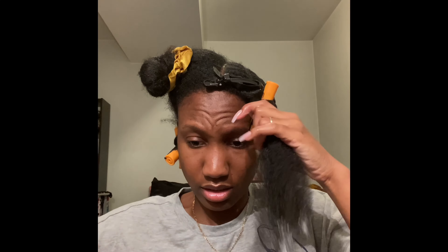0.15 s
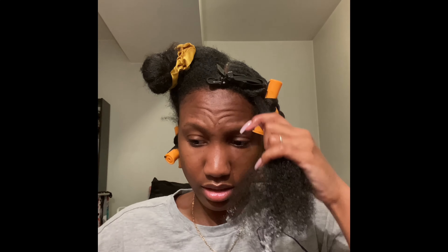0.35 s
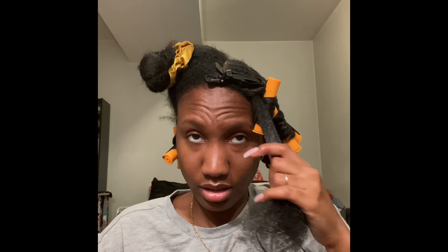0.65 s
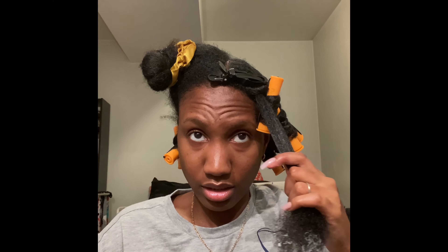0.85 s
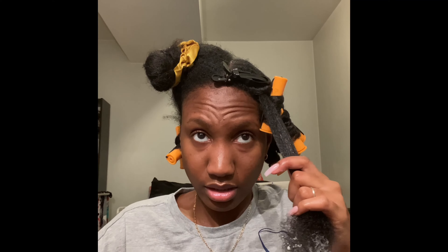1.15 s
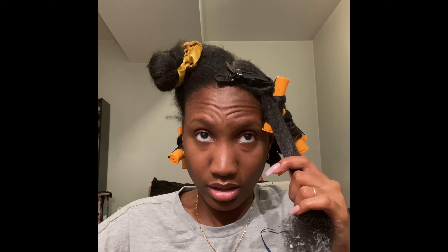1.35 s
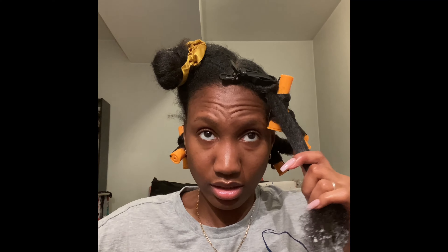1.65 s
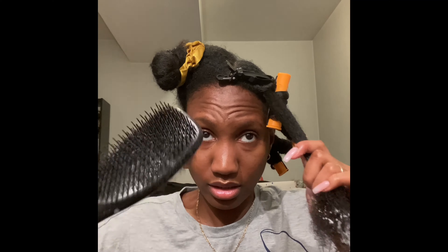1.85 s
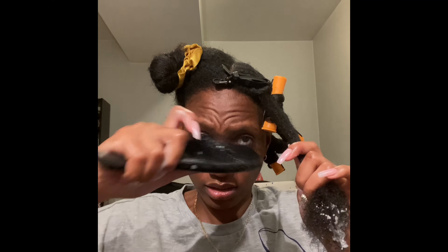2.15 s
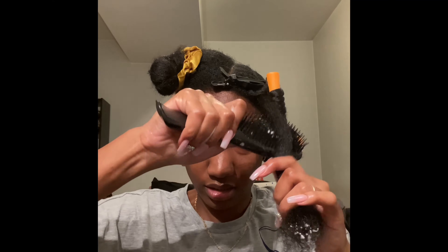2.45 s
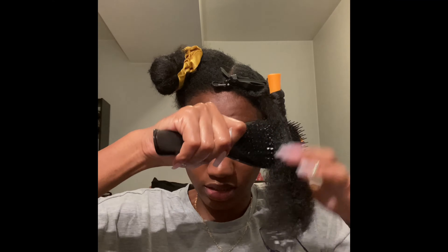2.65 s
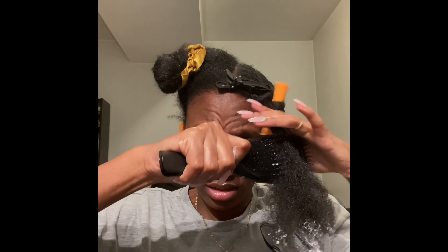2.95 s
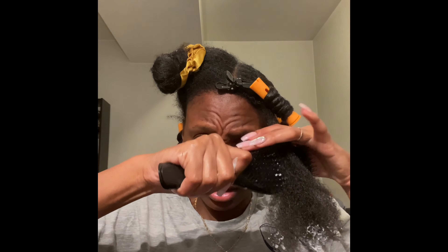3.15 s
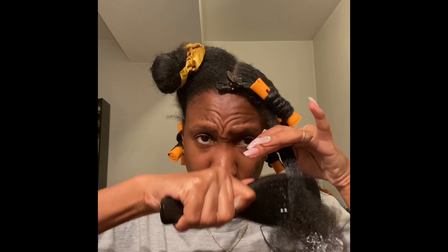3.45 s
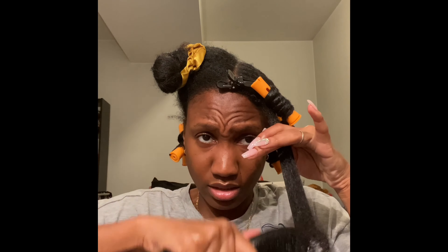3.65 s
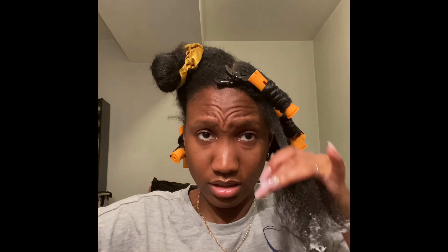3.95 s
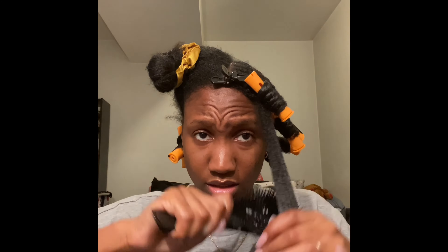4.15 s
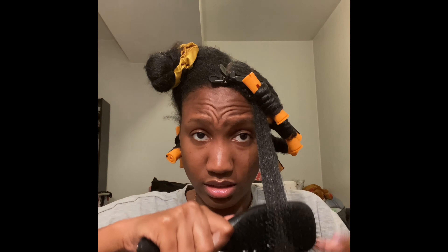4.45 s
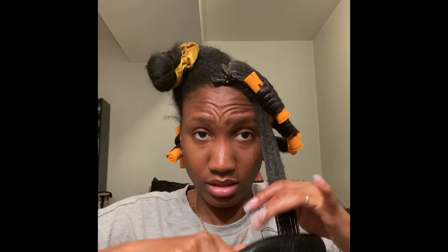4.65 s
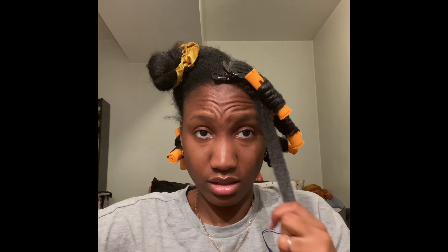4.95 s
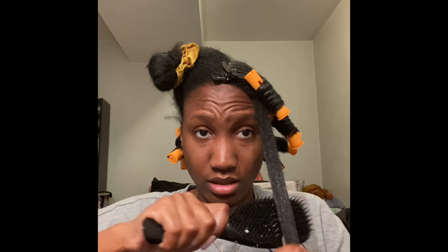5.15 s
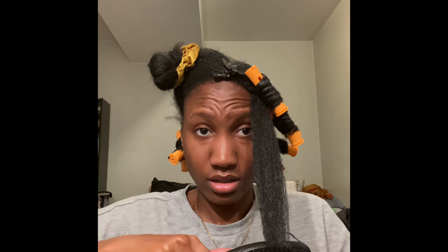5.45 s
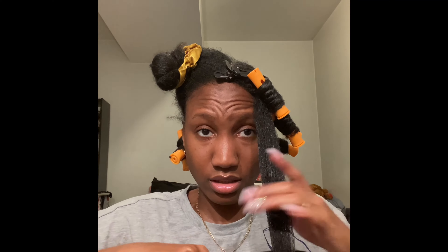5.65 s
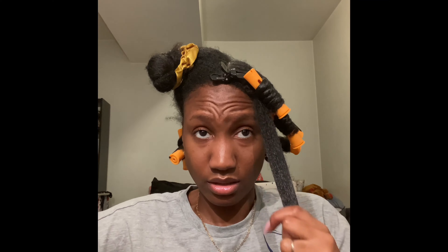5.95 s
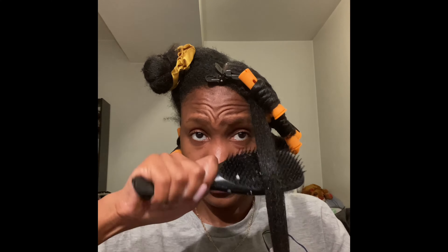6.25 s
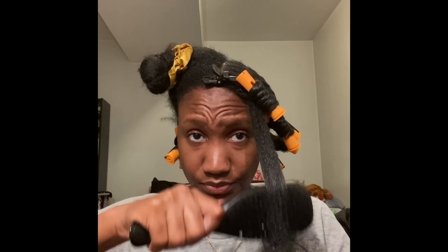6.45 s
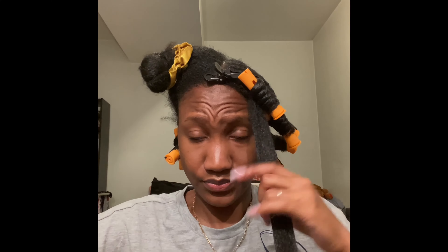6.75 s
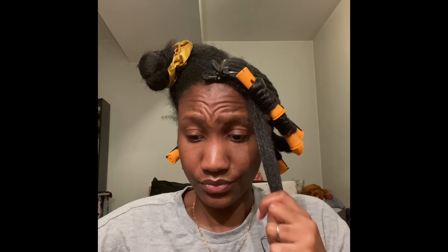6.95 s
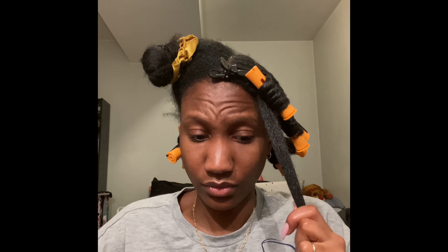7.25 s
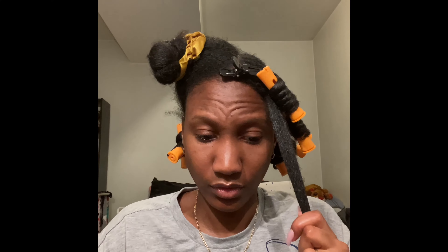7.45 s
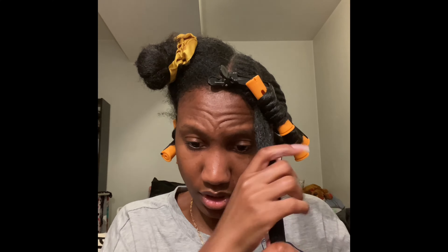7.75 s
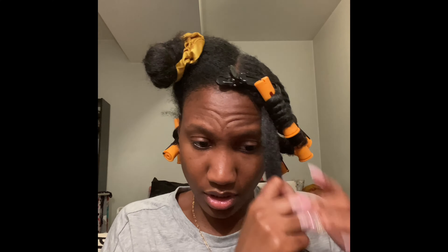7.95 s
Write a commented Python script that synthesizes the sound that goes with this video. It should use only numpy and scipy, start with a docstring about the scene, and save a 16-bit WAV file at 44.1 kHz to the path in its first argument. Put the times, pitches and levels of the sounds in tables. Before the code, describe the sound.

A plastic comb clatters and slides on a desk, then a brush drags softly through damp hair before another clattering burst in a small quiet room.

```python
"""Combs and brushes clatter and slide on a desk top, early and late, close to a pair of microphones.
Blows start decaying modes of plastic and desk; slides drive the plastic modes with dense small slips.
Between, bristles drag through damp hair: grainy friction noise, ringing bristles and tugs on the cushion.
Nails tick on plastic; the small quiet room adds a short tail over low rumble, a hum and faint air noise."""
import sys
import numpy as np
from scipy import signal
from scipy.fft import rfft, irfft, next_fast_len
from scipy.io import wavfile
from scipy.ndimage import uniform_filter1d

SR = 44100
rng = np.random.default_rng(int(sys.argv[2]) if len(sys.argv) > 2 else 0)


def persist_wave(psi):
    """Save psi, clipped to +-1, as 16-bit WAV."""
    counts = np.round(np.clip(psi, -1, 1) * 32767).astype(np.int16)
    wavfile.write(sys.argv[1], SR, np.atleast_2d(counts).T)


N = 357210

# knocks of plastic tools on the desk, levels relative within each layer: start_s, click_db, thud_db,
# hollow_db, crack_db, click_centre_hz, hollow_centre_hz, crack_peak_hz, left_minus_right_db
KNOCKS = [(0.4325, -23.5, -46, -31, -28.5, 2451, 511.3, 4361, 0.5),
          (0.445, -21, -39, -25, -27, 2800, 603, 3150, 3),
          (0.4715, -12, -38, -11.5, -27, 2300, 795.6, 3000, 3.5),
          (0.5021, -16.5, -55, -13.5, -30, 2250, 804, 6010, -3),
          (0.5178, -17, -40, -24.5, -35.5, 2035, 598.3, 3191, 5),
          (0.5505, 0, -13.5, -1.5, -10.5, 2884, 600, 8057, 0.5),
          (0.577, -22, -39.5, -34.5, -37, 2400, 600, 4000, 0),
          (0.6159, -5.5, -21.5, -13, -30.5, 1750, 900, 6000, 1.5),
          (0.644, -42, -30, -22, -54, 1300, 800, 3000, 0),
          (0.6562, -14.5, -25, -28.5, -30, 1775, 1000, 6610, -12),
          (0.6612, -10, -35.5, -37.5, -32.5, 1500, 1000, 6450, 10.5),
          (0.673, -26, -56, -39, -39, 1670, 900, 4980, 1.5),
          (0.6858, -20, -34.5, -51, -45, 1874, 600.8, 7000, 0),
          (0.7095, -43, -40, -35.5, -40.5, 3784, 509, 5000, 6),
          (0.877, -16, -77, -35, -31, 2864, 501.6, 3730, 3),
          (0.8844, -42, -30, -62, -31.5, 2740, 500.5, 6400, 0.5),
          (0.905, -40, -55, -26, -56, 1900, 900, 3300, -6),
          (0.941, -25, -42, -36.5, -39, 2700, 500, 3800, 6),
          (1.004, -35, -34, -34, -74, 1688, 900, 3000, -2),
          (1.0139, -17.5, -27, -35.5, -23, 3900, 403.6, 4400, 3),
          (1.0455, -16.5, -20.5, -13, -21, 3600, 450, 6630, 0),
          (1.2164, -14.5, -34.5, -16, -33.5, 1746, 601.5, 3850, 1.5),
          (1.562, -44, -56.5, -32, -64.5, 1425, 633.8, 2800, 1),
          (1.575, -49, -52, -32, -74.5, 2700, 620, 3570, 7.5),
          (1.5938, -41, -63, -33, -69.5, 1355, 523.4, 3000, 4),
          (7.1995, -25, -24, -28.5, -39, 4900, 428, 7500, 5),
          (7.2125, -11.5, -23.5, -20, -25.5, 2284, 532, 4160, 0),
          (7.2405, -3.5, -19.5, -10.5, -24, 1900, 501, 4030, 2.5),
          (7.2477, -17.5, -30.5, -9, -26.5, 2660, 800, 6310, -4),
          (7.2572, -5, -13.5, -5, -18.5, 2398, 450, 7490, -0.2),
          (7.2755, -9.5, -30, -20, -31.5, 2016, 463, 9500, 3.5),
          (7.281, -24.5, -41.5, -34, -26, 2200, 493, 4200, 1.5),
          (7.3081, -30.5, -38.5, -26.5, -44.5, 2180, 499.8, 3980, 3.5),
          (7.3373, -8, -7.5, -6, -20, 1994, 420, 6510, 2),
          (7.356, -10, -38, -31.5, -37, 3398, 497.7, 5910, 3.5),
          (7.361, -37.5, -34, -29.5, -30, 2975, 501.8, 6540, -1),
          (7.365, -11.5, -38, -1.5, -34.5, 2190, 750, 6650, 1),
          (7.3805, -15, -36.5, -12.5, -39.5, 2100, 798, 4000, 7),
          (7.3985, -7, -21.5, -23.5, -19, 2687, 517.5, 4270, 0.5),
          (7.427, -15.5, -38, -28, -30, 2279, 900, 4320, 3.5),
          (7.457, -19.5, -17, -27, -25.5, 2300, 420, 5550, 2),
          (7.4699, -26, -29, -26, -32.5, 2220, 420, 6500, 1.5),
          (7.4814, -17.5, -27.5, -14.5, -26, 3120, 498, 6150, -3),
          (7.4875, -13, -35, -31, -30, 1400, 1000, 3047, 10),
          (7.4959, -13.5, -32.5, -22.5, -31, 3214, 500, 5490, 8.5),
          (7.501, -16, -29.5, -13.5, -28.5, 2920, 699, 6640, -1.5),
          (7.52, -21, -23, -38, -34.5, 1700, 500, 7400, 1.5),
          (7.533, -21.5, -36.5, -37.5, -41, 2100, 500, 8000, 1),
          (7.5462, -13.5, -44, -19.5, -23, 2214, 600, 4120, 1),
          (7.5555, -1, -23.5, -9, -25.5, 1370, 630, 6300, 1.5),
          (7.5754, -17, -17, -6.5, -30, 2241, 793, 4000, 4),
          (7.6045, -31, -27, -22, -51, 1307, 897, 4000, 18)]
# modes of the desk top: pitch_hz, level_db, t60_s
DESK_MODES = [(65.6, -13.5, 0.39), (110, -13.5, 0.29), (190.7, -0.5, 0.22), (243.2, 2, 0.13),
              (335, 3, 0.0073)]
# hollow modes of the desk and the tools on it, ringing freely: pitch_hz, level_db, t60_s
HOLLOW_MODES = [(380, -6, 0.04), (445, -1, 0.07), (510, -1, 0.045), (625, -2, 0.055), (686, -1.5, 0.04),
                (850, -2, 0.04), (1020, -1, 0.03), (1150, -2, 0.018)]
# modes of the plastic tools, ringing freely: pitch_hz, level_db, t60_s
PLASTIC_MODES = [(1250, -1, .022), (1480, -2, .022), (1700, -5, .02), (1900, -3, .026), (2070, -3, .028),
                 (2290, -1, .03), (2520, -5, .022), (2720, -1, .03), (3300, -4, .022), (3750, -4, .018),
                 (4250, -3, .02), (5200, -6, .012), (6500, -6, .008)]
# resonances of the brush cushion: pitch_hz, width_hz, level_db
CUSHION_PEAKS = [(422, 22, -3), (595, 120, 5), (675.5, 38, 8), (1094, 230, -9), (420, 280, -1)]
# relative spectrum of hair on bristles: frequency_hz, density_db_per_hz
HISS_SPECTRUM = [(700, -14.5), (1100, -7.5), (1800, -18), (3000, -16), (4200, -9), (6000, -8), (11300, -14),
                 (12400, -20), (14500, -46)]
# relative spectrum of hard contact noise: frequency_hz, density_db_per_hz
CRACK_SPECTRUM = [(500, -33.5), (1000, -5.5), (2500, -9), (3200, -2.5), (4800, -11), (7800, -14.5),
                  (11500, -23.5), (13500, -36.5), (15500, -46.5)]
# nominal phase by which the left microphone leads the right for the desk: frequency_hz, lead_rad
DESK_LEAD = [(0, -0.5), (340, -0.26), (1290, 9), (1640, 8), (2410, 4), (3010, 9.5), (3270, 8.5), (4050, 2),
             (4820, 11.5), (6030, 1.5), (7150, 11.5), (9220, 13.5), (12100, 4), (15500, 6.5)]

SNIPPET = 4096  # samples in one blow
PATCHES = 180  # points in time for the changes of chatter and flicker
GRIP_DETUNE = .014  # spread of mode pitch from blow to blow, as a share
FLICKER_DB = 1.6  # spread of the flickering bands of hiss and rustle
SOFT_HZ = 11300  # the treble of clicks and scrapes rolls off above this


def knocks():
    """Each knock is a bright click from its own spot; the desk top answers a moment later with a low thud."""
    # knocks after which the tool rings freely: start_s
    let_go = [0.5178, 1.0455, 1.2164, 1.562, 1.575, 1.5938, 7.2125, 7.2755, 7.3985, 7.427, 7.5462]
    held_ring = .52  # share of the ring time left when the hand stays on the tool
    contact_s = .0015
    crack_peak_db, crack_q = 13.5, 3.8  # each crack has a bright peak of its own
    s, click_db, thud_db, hollow_db, crack_db, click_hz, hollow_hz, crack_hz, pan_db = np.transpose(KNOCKS)
    is_free = np.abs(s[:, None] - let_go).min(axis=1) < .003
    ring_share = np.where(is_free, 1, held_ring)

    thud = lay(s + 0.0021, taps(thud_db - 3.0, DESK_MODES, contact_s, 0.26, size=3 * SNIPPET))
    thud = sos_filter(signal.butter(2, 700, fs=SR, output="sos"), thud)  # the heavy top takes the blow softly
    hollow = taps(hollow_db - 3.5, HOLLOW_MODES, 1.3 * contact_s, 2.3, hollow_hz, 15, GRIP_DETUNE,
                  ring_share=ring_share)
    click = taps(click_db - 4, PLASTIC_MODES, contact_s, 3, click_hz, 26, GRIP_DETUNE, ring_share=ring_share)
    click = sos_filter(signal.butter(4, SOFT_HZ, fs=SR, output="sos"), click)
    crack = []
    for burst, hz in zip(bursts(crack_db + 8, 0.7 * contact_s), crack_hz):
        peak = signal.lfilter(*signal.iirpeak(hz, crack_q, SR), burst)
        crack.append(burst + amp(crack_peak_db) * peak)
    bright = click + colour(np.array(crack), CRACK_SPECTRUM)
    placed = lay(s, place(hollow + bright, DESK_LEAD, pan_db))
    return thud, lay(s, hollow), lay(s, bright), placed


def slides():
    """Dragging tools chatter on the desk: dense small blows that wander from mode to mode, over a dry hiss."""
    # tools dragged over the desk, levels at full strength:
    # start_s, end_s, scrape_db, hollow_db, hiss_db, boom_db, scrape_centre_hz
    drag_marks = [(0.439, 0.431, -82, -78, -75, -75.5, 2400), (0.453, 0.517, -35, -47.5, -49.5, -59, 2221),
                  (0.626, 0.725, -63, -42, -80, -45, 1604), (0.796, 0.885, -59.5, -46, -65.5, -49, 2495),
                  (0.894, 0.935, -46, -40, -58, -41, 3300), (0.938, 0.984, -46, -45.5, -56.5, -44, 2870),
                  (1.078, 1.119, -39.5, -40.5, -50.5, -56, 2610), (1.14, 1.137, -57, -39, -69, -58, 1510),
                  (1.18, 1.194, -72, -52.5, -71, -38.5, 2227), (1.538, 1.556, -77, -78, -77, -74, 1590),
                  (1.421, 1.497, -85, -81, -100.5, -75, 1874), (1.575, 1.585, -53, -50, -66, -53, 2013),
                  (7.191, 7.199, -68, -67, -73, -79, 2800), (7.345, 7.398, -34.5, -22, -61, -30, 2362),
                  (7.425, 7.54, -44.5, -40.5, -64, -27, 2360), (7.6, 7.744, -85, -83, -89, -60.5, 2003)]
    rise_db_per_s, fall_db_per_s = 895.5, 354.5
    wander_db = 5  # spread of mode strengths along a slide
    slide_detune, slide_damping = .03, .9  # spread of pitch along a slide; share of ring time left in contact
    *drag, boom_gain = held(np.array(drag_marks)[:, :6], rise_db_per_s, fall_db_per_s)
    scrape_gain, hollow_gain, hiss_gain = np.hypot(drag, chatter())

    # the favoured pitch moves from event to event
    moments = (np.arange(PATCHES) + .5) * N / PATCHES / SR
    centres = [(row[0], row[5]) for row in KNOCKS]
    centres += [((row[0] + row[1]) / 2, row[-1]) for row in drag_marks]
    s, centre_hz = np.transpose(sorted(centres))
    scrape_hz = np.interp(moments, s, centre_hz)
    hollow_hz = np.interp(moments, *np.array(KNOCKS)[:, [0, 6]].T)
    steps = np.arange(N) * PATCHES // N
    wander = wander_db * rms_one(rng.standard_normal((len(PLASTIC_MODES), PATCHES)))
    scrape_lean = amp(wander + favour(PLASTIC_MODES, scrape_hz, 40.0))
    hollow_lean = amp(wander[:len(HOLLOW_MODES)] + favour(HOLLOW_MODES, hollow_hz, 4.2))

    rattle = grains(1200.0, 3.0, 2.0)
    pressed = ring(rattle * scrape_lean[:, steps], np.array(PLASTIC_MODES) * [1, 1, slide_damping])
    # the pitch drifts with pressure: the sound is read at an uneven pace without a lasting offset
    pace = slide_detune * rms_one(signal.resample(rng.standard_normal(PATCHES), N))
    drift = np.cumsum(pace - uniform_filter1d(pace, size=SR // 4))
    pressed = np.interp(np.arange(N) + drift, np.arange(N), pressed)
    hiss = patchy(colour(rattle, CRACK_SPECTRUM), FLICKER_DB)
    bright = scrape_gain * rms_one(pressed) + hiss_gain * hiss
    boom = rms_one(ring([grains(140.0, 0.83, -8.5)] * len(DESK_MODES), DESK_MODES))
    hollow = rms_one(ring(rattle * hollow_lean[:, steps], HOLLOW_MODES))
    return boom_gain * boom + hollow_gain * hollow, bright


def chatter():
    """After a knock the tool chatters on: gains for scrape, hollow and hiss jump and die away."""
    # tails that follow click, hollow knock and crack: level_under_knock_db, t60_s
    chatter_tails = [(-29, 0.16), (-19.5, 0.19), (-25, 0.3)]
    knock, power = np.array(KNOCKS), np.zeros((3, N))
    for row, db, (under_db, t60) in zip(power, knock[:, [1, 3, 4]].T, chatter_tails):
        row[(knock[:, 0] * SR).astype(int)] = amp(db + under_db) ** 2
        row[:] = signal.lfilter([1], [1, -amp(-60 / (t60 * SR)) ** 2], row + 1e-18)
    return np.sqrt(power)


def strokes():
    """Strands slip off the bristles: a grainy hiss, ringing bristles, and tugs that ring the cushion."""
    # brush and fingers through the hair, one curve a stroke: time_s, hiss_db, cushion_db
    stroke_curves = [
        [(0.0, -71, -97), (0.05, -80, -102)],
        [(2.85, -83, -103.5), (2.98, -78.5, -84.5), (3.09, -76, -85.5), (3.204, -70.5, -66),
         (3.292, -67, -68.5), (3.414, -62, -50.5), (3.544, -61, -51), (3.622, -71.5, -51)],
        [(3.75, -70.5, -57), (3.812, -70, -53.5)],
        [(4.1, -69, -73.5), (4.204, -72, -76.5), (4.344, -78.5, -83)],
        [(4.4, -74.5, -79.5), (4.584, -66.5, -54), (4.626, -65, -54.5), (4.764, -66.5, -52.5)],
        [(5.066, -66.5, -63), (5.132, -73, -69), (5.184, -64, -69), (5.23, -68, -65)],
        [(5.606, -66, -68), (5.752, -68.5, -65), (5.824, -81, -54)],
        [(6.074, -76.5, -69.5), (6.152, -68, -65), (6.264, -72.5, -86), (6.336, -68.5, -68),
         (6.598, -77.5, -79.5), (6.696, -72, -66.5), (6.77, -67, -71.5)],
    ]
    # the bristles whisper alone: start_s, end_s, level_db
    faint_marks = [(0.12, 0.22, -87), (7.83, 7.99, -80.5)]
    # bristle notes that stand alone when barely touched: pitch_hz, width_hz, level_db
    whisper_notes = [(2050, 55, 0), (3750, 120, -5)]
    # bristle notes under a full stroke: pitch_hz, width_hz, level_db
    bristle_notes = [(1390, 80, -1), (2010, 160, 1.5), (2700, 68, 1), (3670, 490, -7)]
    bite_db_per_s, lift_db_per_s = 425, 272  # the hiss of a stroke sets in and dies away
    cushion_quicker = 2.7  # the cushion does so faster by this factor
    ring_from_cushion, ring_db = 0.32, -2  # the bristles ring with a blend of hiss and cushion level

    whisper_gain = held(faint_marks, bite_db_per_s, lift_db_per_s)[0]
    whisper = whisper_gain * resonate(rng.standard_normal(N), whisper_notes)
    hiss_gain = cushion_gain = ring_gain = 0
    for rows in stroke_curves:
        levels, edges = shape(rows, bite_db_per_s, lift_db_per_s)
        hiss_db = levels[0] + edges
        cushion_db = levels[1] + cushion_quicker * edges
        hiss_gain = hiss_gain + amp(hiss_db)
        cushion_gain = cushion_gain + amp(cushion_db)
        ring_gain = ring_gain + amp(ring_db + hiss_db + ring_from_cushion * (cushion_db - hiss_db))

    catch = snags(hiss_gain)
    slips = catch * grains(900.0, 4.0, 4.0)
    plucks = catch * grains(500.0, 4.7, -2.0)
    tugs = catch * grains(250.0, 4.0, -4.0)
    hiss = hiss_gain * rms_one(colour(slips, HISS_SPECTRUM))
    bristles = ring_gain * resonate(plucks, bristle_notes)
    return whisper + hiss + bristles + cushion_gain * resonate(tugs, CUSHION_PEAKS)


def snags(hiss_gain):
    """Gain that leaps when a knot catches and relaxes within milliseconds; a strong pull catches more knots."""
    most_per_s, relax_s, leap_db = 67, 0.0019, -0.5  # the leap is scaled by an uneven share below
    pull = np.minimum(hiss_gain / hiss_gain.max() * 1.5, 1)
    caught = (rng.random(N) < most_per_s / SR * pull ** 2) * rng.uniform(0.64, 0.75, N)
    return 1 + amp(leap_db) * signal.lfilter([1], [1, -np.exp(-1 / (relax_s * SR))], caught)


def ticks():
    """A sharp tick rings plastic near its own pitch and the cushion; bristles rustle just before and after."""
    # nails and bristle tips on plastic, levels relative within each layer:
    # start_s, tick_db, crack_db, cushion_db, tick_centre_hz
    tick_marks = [(0.326, -95, -65, -97, 6030), (2.2256, -41.5, -43.5, -42, 3710),
                  (2.251, -58.5, -65, -68, 2570), (2.2725, -55.5, -45.5, -48, 2730),
                  (2.3736, -45, -59.5, -66, 2400), (2.3857, -63.5, -68, -53, 1370),
                  (2.6352, -39.5, -43.5, -76, 5030), (2.8172, -65, -57, -89, 3570),
                  (3.3902, -50, -65, -53, 1260), (3.406, -49.5, -69, -42, 1870),
                  (3.43, -51, -72, -57, 2140), (3.546, -48, -59, -57.5, 2027),
                  (3.6188, -66.5, -54.5, -56, 2020), (4.458, -64, -68, -60, 2070),
                  (4.498, -67.5, -69.5, -55, 2000), (4.516, -63, -68, -60, 2050),
                  (4.561, -56, -61, -41, 1930), (4.578, -59, -72, -58, 1810),
                  (4.594, -51.5, -67, -35.5, 1660), (4.6365, -56, -44, -46, 2040),
                  (4.692, -66.5, -70, -53, 2030), (4.714, -65, -72, -53, 3750),
                  (4.742, -60, -71.5, -44, 2016), (4.7644, -52, -63.5, -33.5, 1853),
                  (5.0641, -65, -52.5, -63.5, 1410), (5.7394, -67.5, -55, -47, 6170),
                  (5.7578, -91, -45.5, -49.5, 2283), (5.7832, -64.5, -54, -40, 2640),
                  (5.8186, -79, -86, -72.5, 1400), (6.0653, -64.5, -71, -64.5, 1970),
                  (7.733, -63.5, -50.5, -66.5, 4630)]
    # relative spectrum of the tick noise: frequency_hz, density_db_per_hz
    tick_spectrum = [(350, -98), (600, -12), (828, -43), (1100, 7), (3410, 5.5), (4350, 4.5), (5150, 7.5),
                     (13000, -16.5)]
    # relative spectrum of the rustling bristles: frequency_hz, density_db_per_hz
    rustle_spectrum = [(600, -30), (1000, -5), (2000, -4), (3500, -1), (5500, -10), (9000, -12.5),
                       (13000, -30.5)]
    lead_s, rise_t60_s = .01, .025  # the rustle swells ahead of a tick
    rustle_db, fall_t60_s = -10.5, 0.23  # and goes on after it
    s, tick_db, crack_db, cushion_db, centre_hz = np.transpose(tick_marks)
    cushion_modes = [(hz, db, 2.2 / width_hz) for hz, width_hz, db in CUSHION_PEAKS]  # width to ring time
    cushion = taps(cushion_db - 14, cushion_modes, 0.0006, 2.5)
    plastic = taps(tick_db + 1, PLASTIC_MODES, 0.00094, 1.0, centre_hz, 17.0, GRIP_DETUNE)
    snap = colour(bursts(tick_db + 20.5, 0.0012), tick_spectrum)
    snap = snap + colour(bursts(crack_db + 13.0, 0.0013), HISS_SPECTRUM)

    t = np.arange(3 * SNIPPET) / SR - lead_s
    swell = amp(-60 * np.abs(t) / np.where(t < 0, rise_t60_s, fall_t60_s))
    rustle_gain = lay(s - lead_s, amp((tick_db + crack_db) / 2 + rustle_db)[:, None] * swell)
    rustle = rustle_gain * patchy(colour(grains(730.0, 2.6, 3.1), rustle_spectrum), FLICKER_DB)
    return lay(s, cushion + plastic + snap), rustle


def room(x):
    """A diffuse tail of dying noise for each side; the treble dies twice as fast."""
    t60_s, wall_cut_hz = 0.27, 6000
    t = np.arange(SR // 2) / SR
    noise = rng.standard_normal((2, len(t))) * np.clip(t / 0.00025, 0, 1)
    dull = sos_filter(signal.butter(1, wall_cut_hz, fs=SR, output="sos"), noise)
    tail = dull * amp(-60 * t / t60_s) + (noise - dull) * amp(-120 * t / t60_s)
    return signal.fftconvolve(x[None], tail / np.sqrt(np.sum(tail[0] ** 2)), axes=1)[:, :N]


def background():
    """Rumble and hum reach both microphones together, a touch stronger left; the air noise is separate."""
    # the rumble swells as arms move and the desk shakes: start_s, end_s, level_db
    swell_marks = [(0.62, 0.66, -37), (3.27, 3.44, -46), (6.3, 6.5, -55), (7.38, 7.51, -27.5)]
    # relative spectrum of the rumble: frequency_hz, density_db_per_hz
    rumble_spectrum = [(22, -29.5), (35, -13), (55, 3.5), (90, -4), (110, -1.5), (140, -11), (190, -14),
                       (250, -28.5), (320, -34.5), (450, -53.5), (900, -74)]
    # relative spectrum of the air noise: frequency_hz, density_db_per_hz
    air_spectrum = [(210, -23.5), (350, -5.5), (529, -14.5), (681, -13), (1190, -18.5), (2040, -20),
                    (9180, -22.5), (13000, -31.5), (15500, -41.5)]
    hum_hz, hum_db, hum_waver_db = 122.1, -58, 2.5
    rumble_db, rumble_waver_db = -54, 1.5
    air_db, air_waver_db = -80.5, 1.5
    swell_rise_db_per_s, swell_fall_db_per_s = 127.5, 143
    swell_cut_hz = 35  # the swells lack the deepest rumble

    waver = slow_waver(120)
    hum_phase = 2 * np.pi * hum_hz * np.arange(N) / SR + 0.75 * waver
    hum = amp(hum_db + hum_waver_db * waver) * np.sqrt(2) * np.sin(hum_phase)
    calm_gain = amp(rumble_db + rumble_waver_db * slow_waver(16))
    calm = calm_gain * colour(rng.standard_normal(N), rumble_spectrum)
    shake = sos_filter(signal.butter(4, swell_cut_hz, "high", fs=SR, output="sos"),
                       colour(rng.standard_normal(N), rumble_spectrum))
    swells = held(swell_marks, swell_rise_db_per_s, swell_fall_db_per_s)[0] * shake
    low = amp([[.3], [-.3]]) * (calm + swells + hum)
    air = colour(rng.standard_normal((2, N)), air_spectrum)
    return low + amp(air_db + air_waver_db * slow_waver(40)) * air


def place(x, lead, pan_db):
    """Two microphones share each row; their difference holds a phase lead by frequency and scattered paths."""
    scatter_db, scatter_s = -12, 0.0014
    size = next_fast_len(x.shape[1] + 2048)
    hz = np.arange(size // 2 + 1) * SR / size
    turn = np.interp(hz, *np.transpose(lead)) / 2 * np.tanh(hz / 200)  # the bass arrives together
    paths = rng.standard_normal((len(x), 600)) * np.exp(-np.arange(600) / SR / scatter_s)
    paths = paths / np.sqrt(np.sum(paths ** 2, axis=1, keepdims=True))
    short_waves = hz / np.hypot(hz, 450)  # long waves pass small obstacles undisturbed
    scattered = amp(scatter_db) * short_waves * rfft(paths, size)
    # the lead as a bounded tangent, so the sum never cancels
    apart = 1j * 1.2 * np.sin(2 * turn) / (1.4 + np.cos(2 * turn)) + scattered
    sides = np.array([[1], [-1]])
    ports = amp(np.reshape(pan_db, (-1, 1, 1)) / 2 * sides) * (1 + apart[:, None] * sides)
    return irfft(ports * rfft(x, size)[:, None], size)[..., :x.shape[1]]


def taps(db, modes, contact_s, spread_db, centre_hz=None, narrow_db=22, detune=0, size=SNIPPET, ring_share=1):
    """One row per blow: modes start around the contact time, detuned at random, strongest near the centre."""
    hz, mode_db, t60 = np.array(modes).T[:, None, :, None]
    t60 = t60 * np.reshape(ring_share, (-1, 1, 1))
    delay, strength, sign, shift = np.moveaxis(rng.standard_normal((len(db), 4, len(modes), 1)), 1, 0)
    t = np.maximum(np.arange(size) / SR - np.abs(delay) * contact_s, 0)
    levels = db[:, None, None] + mode_db + spread_db * strength
    if centre_hz is not None:
        levels = levels + favour(modes, centre_hz, narrow_db).T[..., None]
    turns = 2 * np.pi * hz * (1 + detune * shift) * t
    gains = np.sign(sign) * amp(levels - 60 * t / t60) * np.tanh(t / contact_s)
    return np.sum(gains * np.sin(turns), axis=1)


def favour(modes, centre_hz, narrow_db):
    """dB for each mode, falling with the square of its distance in octaves from the centre."""
    return -narrow_db * np.log2(np.array(modes)[:, :1] / centre_hz) ** 2


def bursts(db, contact_s):
    """One row per blow: a brief swelling and dying burst of contact noise."""
    rise = np.arange(SNIPPET) / SR / np.clip(contact_s, 1e-4, .004)
    noise = rng.standard_normal((len(db), SNIPPET)) * rise * np.exp(-rise)
    return amp(db)[:, None] * noise / np.sqrt(np.sum(noise ** 2, axis=1, keepdims=True))


def grains(per_s, spread_db, bed_db):
    """Random slips of uneven size over a bed of smooth friction noise; rms 1."""
    sizes = amp(spread_db * np.minimum(rng.exponential(1, N), 4)) * rng.choice([-1, 1], N)
    slips = rms_one(sizes * (rng.random(N) < per_s / SR))
    return rms_one(slips + amp(bed_db) * rng.standard_normal(N))


def ring(x, modes):
    """Clicks set decaying modes ringing; x has one row for each mode."""
    out = 0
    for row, (hz, db, t60) in zip(x, modes):
        r, w = amp(-60 / (t60 * SR)), 2 * np.pi * hz / SR
        out = out + signal.lfilter([0, amp(db) * np.sin(w)], [1, -2 * r * np.cos(w), r * r], row + 1e-18)
    return out


def resonate(x, peaks):
    """Parallel resonances with alternating signs swell and fade on their own as the brush bends; rms 1."""
    bend_db, bends = 2.5, 200  # spread; points in time
    bend = bend_db * stretch(rng.standard_normal((len(peaks), bends)))
    out = 0
    for k, (hz, width_hz, db) in enumerate(peaks):
        r = np.exp(-np.pi * width_hz / SR)
        a = [1, -2 * r * np.cos(2 * np.pi * hz / SR), r * r]
        gain = (-1) ** k * amp(db + bend[k]) * (1 - r * r)
        out = out + gain * signal.lfilter([1, 0, -1], a, x)
    return rms_one(out)


def patchy(x, depth_db):
    """Third-octave bands from 500 Hz up flicker in level, each on its own; rms 1."""
    edges, out = 500 * 2 ** (np.arange(16) / 3), 0
    flicker = stretch(rng.standard_normal((15, PATCHES)))
    for low, high, row in zip(edges, edges[1:], flicker):
        band = sos_filter(signal.butter(2, [low, high], "band", fs=SR, output="sos"), x)
        out = out + amp(depth_db * row) * band
    return rms_one(out)


def colour(x, spectrum):
    """Minimum-phase filter that follows a spectrum, so nothing sounds early; unit energy."""
    hz, db = np.transpose(spectrum)
    grid = np.log(np.arange(4097) * SR / 8192 + 1)
    cepstrum = irfft(np.interp(grid, np.log(hz), db) * np.log(10) / 20)
    cepstrum[1:4096] *= 2  # fold the cepstrum to its causal half
    cepstrum[4097:] = 0
    response = irfft(np.exp(rfft(cepstrum)))
    response = response / np.sqrt(np.sum(response ** 2))
    rows = signal.fftconvolve(np.atleast_2d(x), response[None], axes=1)
    return rows[:, :x.shape[-1]].reshape(x.shape)


def shape(rows, rise_db_per_s, fall_db_per_s):
    """dB columns of one gesture over time, and its edges: a straight rise before and fall after its rows."""
    t = np.arange(N) / SR
    s, *columns = np.transpose(rows)
    early, late = np.maximum(s[0] - t, 0), np.maximum(t - s[-1], 0)
    return np.array([np.interp(t, s, c) for c in columns]), -rise_db_per_s * early - fall_db_per_s * late


def held(rows, rise_db_per_s, fall_db_per_s):
    """Gains of events that rise, hold their dB columns from start to end, and fall."""
    out = 0
    for start, end, *db in rows:
        levels, edges = shape([(start, *db), (end, *db)], rise_db_per_s, fall_db_per_s)
        out = out + amp(levels + edges)
    return out


def lay(times, rows):
    """Puts each row on the time line at its time."""
    out = np.zeros(rows.shape[1:-1] + (N + rows.shape[-1],))
    for s, row in zip(times, rows):
        start = round(s * SR)
        out[..., start:start + row.shape[-1]] += row
    return out[..., :N]


def stretch(points):
    """Smooth curves through rows of points over the whole time, in steps of 63 samples."""
    return signal.resample(points, N // 63, axis=1).repeat(63, axis=1)


def slow_waver(points):
    """A smooth random curve; rms 1."""
    return rms_one(signal.resample(rng.standard_normal(points), N))


def sos_filter(sections, x):
    """Runs a filter made of second-order sections."""
    return signal.sosfilt(sections, x)


def amp(db):
    """Decibels to gain."""
    return 10 ** (np.asarray(db) / 20)


def rms_one(x):
    """Scales to rms 1."""
    return x / np.sqrt(np.mean(x ** 2) + 1e-30)


def scene():
    """The desk sounds lean left on the whole, the hair stays near the middle; all share the room."""
    # nominal phase by which the left microphone leads the right for the hair: frequency_hz, lead_rad
    hair_lead = [(0, 4), (780, -2), (1550, -3), (2670, -14.5), (3620, -20.5), (4220, 1.5), (4740, -11),
                 (5170, -20.5), (5510, -45.5), (7490, -25.5), (8960, -1), (11000, -28), (11800, 17.5),
                 (15500, -38)]
    desk_gap_hz = 158  # thud and boom have a dip between the second and third desk modes
    thud, hollow, click, placed_knocks = knocks()
    boom, scrape = slides()
    scrape = sos_filter(signal.butter(8, SOFT_HZ, fs=SR, output="sos"), scrape)
    hair = strokes()
    tick, rustle = ticks()
    low = signal.lfilter(*signal.iirnotch(desk_gap_hz, 2.5, SR), thud + boom)
    desk = place(np.array([low, scrape]), DESK_LEAD, [2.2, 1.8]).sum(axis=0) + placed_knocks
    head = place((hair + tick + rustle)[None], hair_lead, 0.32)[0]
    wet = amp(-13.5) * (click + scrape) + amp(-19.0) * (thud + hollow + boom)
    wet = wet + amp(-10.0) * hair + amp(-5.5) * tick
    return desk + head + room(wet) + background()


def record(dry):
    """The microphones lose the deepest bass and round the highest peaks; the top is cut."""
    bass_cut_hz, top_cut_hz = 50, 15900
    dry = sos_filter(signal.butter(3, bass_cut_hz, "high", fs=SR, output="sos"), dry)
    rounded = .95 * np.tanh(dry / .95)
    return sos_filter(signal.cheby2(16, 100, top_cut_hz, fs=SR, output="sos"), rounded)


dry = scene()
out = record(dry)
persist_wave(out)
```